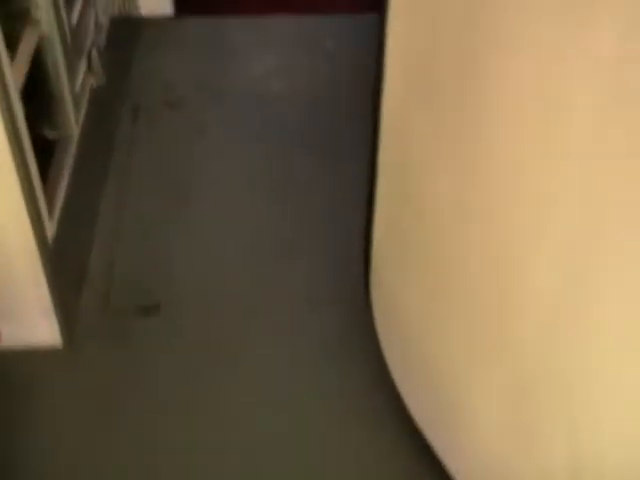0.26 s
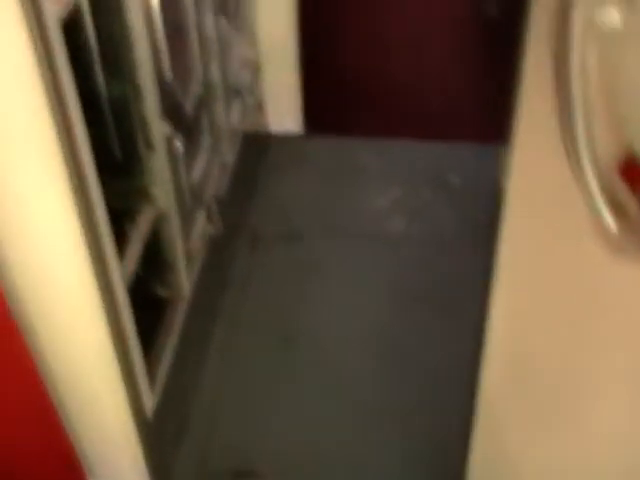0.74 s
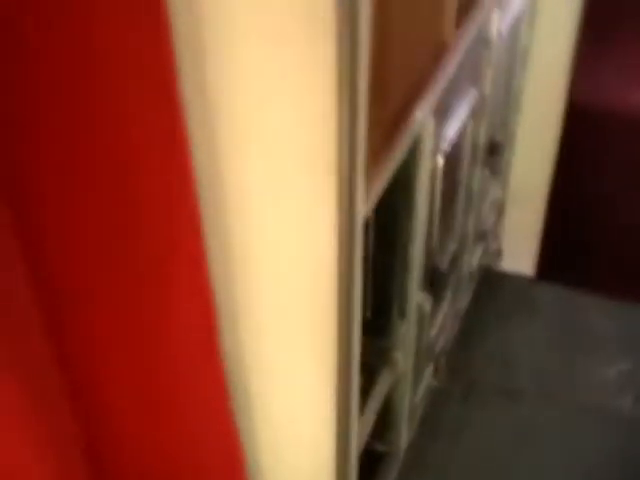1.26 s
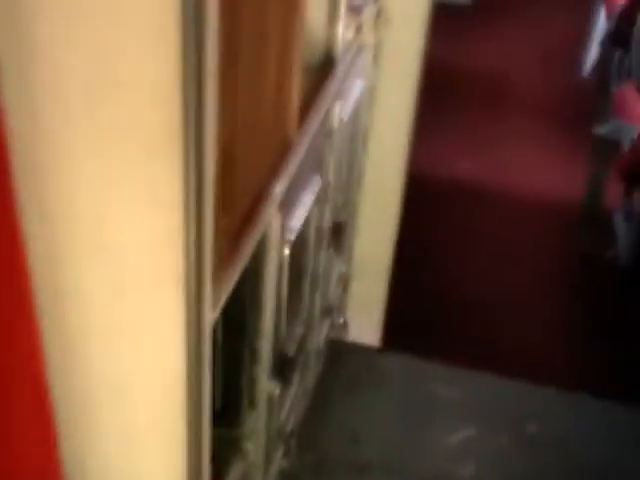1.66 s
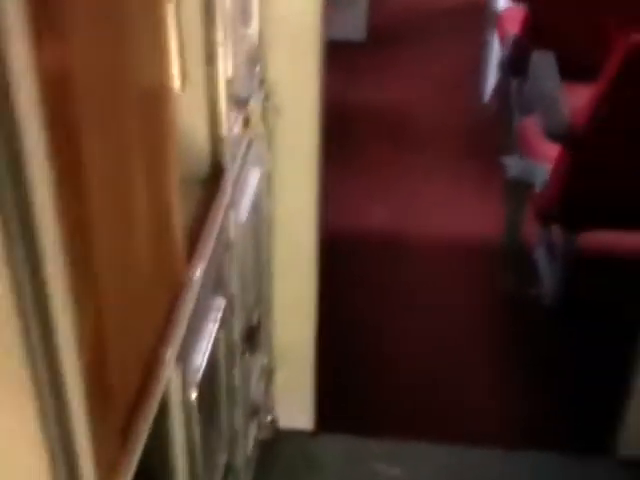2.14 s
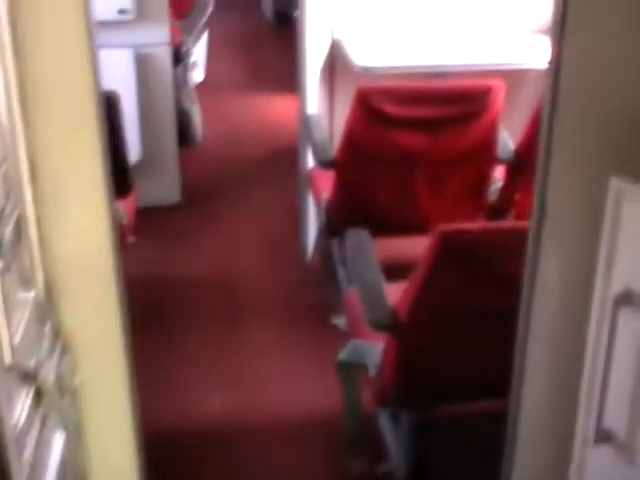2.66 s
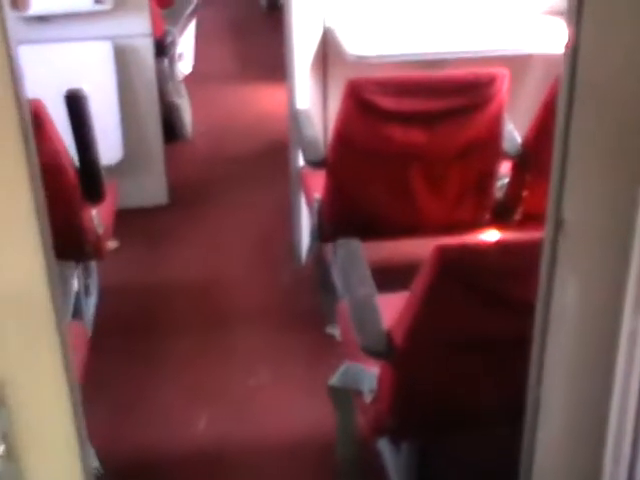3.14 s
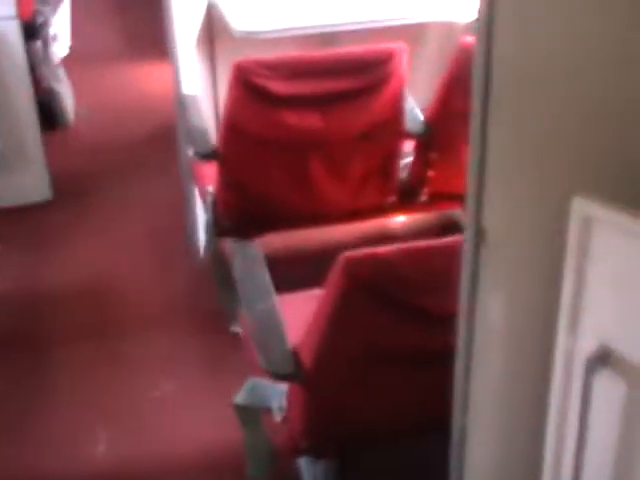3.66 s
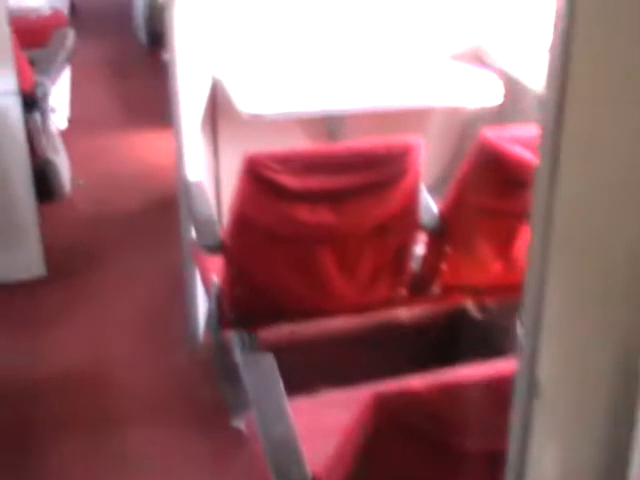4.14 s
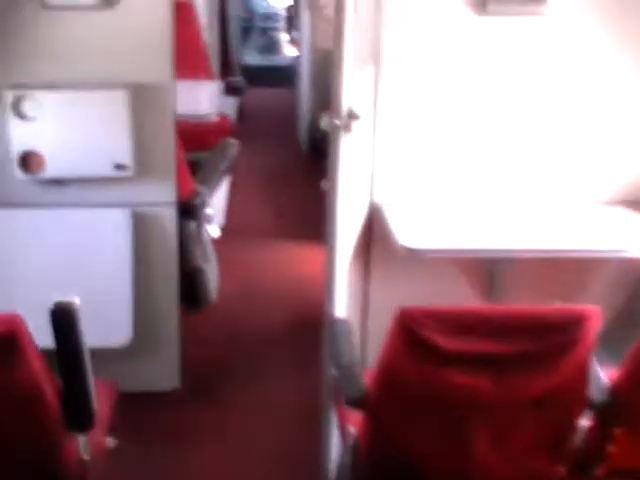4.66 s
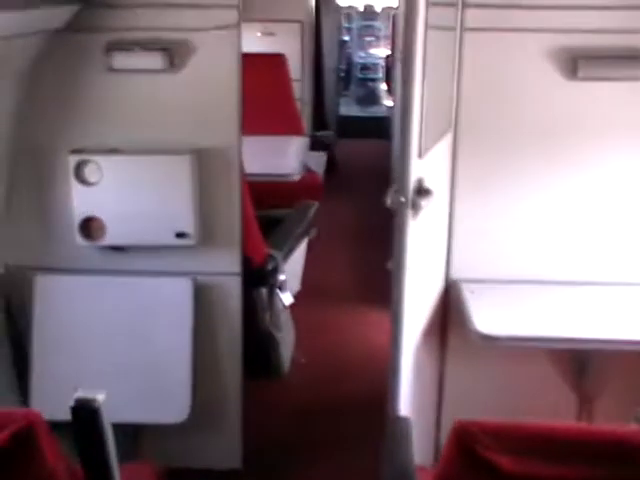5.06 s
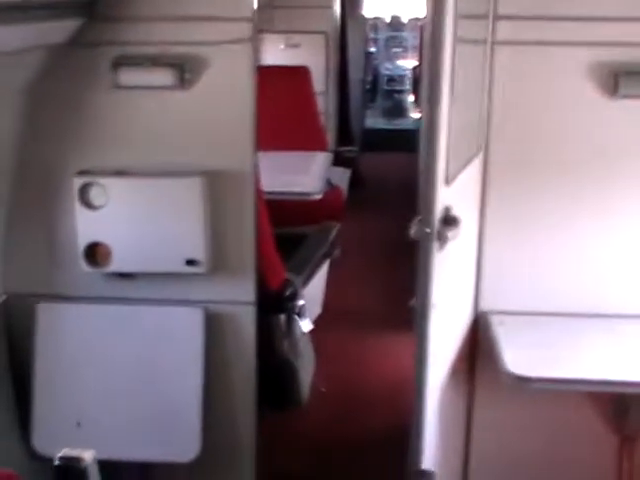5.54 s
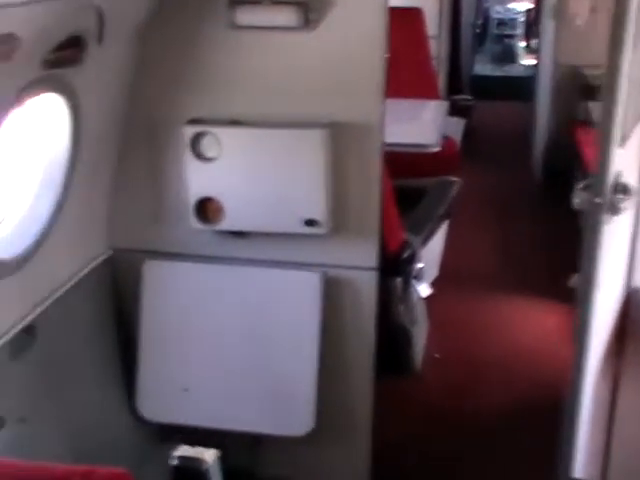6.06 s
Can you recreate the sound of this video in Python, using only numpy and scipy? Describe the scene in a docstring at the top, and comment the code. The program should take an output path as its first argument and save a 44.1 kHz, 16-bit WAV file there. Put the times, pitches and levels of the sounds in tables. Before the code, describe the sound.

A walker shifts about on hollow floor panels inside a small, padded aircraft cabin. One muted step, one hard cracking bang with a short woody rattle, then a flurry of gritty scuffs. Later steps are dull heel and toe thuds with light clicks, a brief low squeaky drag and a last quick tap. Dry, close stereo sound, low room tone, thin hiss and barely audible high electronic whine.

```python
"""Footsteps lead: someone walks the galley and aisle of a parked airliner, holding a small camera.
Heels ring hollow floor panels as damped modes under a noisy slap; one blow rings a hard cabinet.
Soles scuff and crunch as swells of coloured noise; short clicks, many at the edges of footfalls and
scuffs, are sharp edges with a ring. The floor groans and clothes rustle as noise on level curves.
The padded cabin answers with short dying noise; the camera adds hiss and two thin sine whines."""
import sys
import numpy as np
from scipy import signal
from scipy.fft import rfft, irfft, next_fast_len
from scipy.io import wavfile
from scipy.ndimage import uniform_filter1d, map_coordinates

SR = 44100
rng = np.random.default_rng(int(sys.argv[2]) if len(sys.argv) > 2 else 0)


def master_out(mix):
    """Clip the mix to full scale and print it as 16-bit PCM to the path in sys.argv[1]."""
    frames = np.transpose(np.atleast_2d(mix))
    ceiling = np.clip(frames, -1, 1)
    pcm = np.round(ceiling * 32767).astype(np.int16)
    wavfile.write(sys.argv[1], SR, pcm)


def ratio(d):
    """dB to gain"""
    e = np.asarray(d, float) / 20
    return 10 ** e


N = 278271  # length in samples

# Levels of events are peaks of the dry sound, before cabin and microphones.
# Heel and toe contacts: start_s, level_db, pitch_hz (favoured panel), t60_s (ring), rise_ms
FOOTFALLS = [(0.318, -13.5, 226, 0.23, 27), (0.55, -32.5, 226, 0.97, 37), (1.455, -16.5, 268.4, 0.098, 31),
             (2.045, -40, 156, 0.061, 1.7), (2.112, -39, 248.4, 0.19, 4.5), (2.184, -34.5, 565, 0.2, 0.53),
             (2.839, -12, 156, 0.09, 0.4), (2.924, -15.5, 156, 0.063, 0.59), (3.115, -35, 156, 0.12, 3),
             (3.6244, -19.5, 322, 0.054, 0.59), (3.696, -33, 260, .084, 1.2),
             (3.714, -34, 82.2, 0.068, 5.2), (3.878, -38, 198.8, 0.18, 4.6), (4.638, -35, 88, 0.36, 3.3),
             (4.676, -19, 164.3, 0.23, 0.94), (4.873, -37, 112, 0.061, 5), (5.118, -40.5, 88.8, 0.1, 5.1),
             (5.632, -21.5, 485, 0.041, 1.1), (5.694, -32, 565, 0.1, 0.84), (5.727, -21, 755, 0.11, 0.19),
             (5.94, -43.5, 156, 0.19, 2.3)]
# Modes of the floor panels: pitch_hz, level_db, share (of the contact's ring time)
FLOOR_PANELS = [(79.8, 3, 0.64), (112, 2, 0.68), (156, 1, 0.98), (226, 3.5, 0.38), (260, -6.5, 1),
                (296.7, -0.5, 0.92), (365.6, 9, 0.32), (435.6, 2.5, 0.59), (485, -1.5, 0.55),
                (565, 3.5, 0.7), (750, -13, 0.96), (757, 8.5, 0.15)]
# Colour of the sole's slap: pitch_hz, level_db
SLAP_COLOUR = [(150, -8.5), (500, 2), (1500, -0.5), (2500, -12.5), (5000, -31.5), (12000, -46)]
# Dying away of the slap: pitch_hz, t60_s
SLAP_DECAY = [(200, 0.22), (1000, 0.077), (3000, 0.025)]
# Slap over thud at 250 Hz; more on high spots, less as the sole rolls slowly
SLAP_DB, SLAP_DB_PER_OCTAVE, SLAP_DB_PER_MS = -5.5, 1.5, -0.28

# Blow on the cabinet: start_s, level_db (peak of its crack)
BLOWS = [(1.0943, 4)]
# Modes of the cabinet: pitch_hz, level_db, t60_s
CABINET_MODES = [(110, -12, 0.12), (157, -17.5, 0.13), (236, -23, 0.021), (357, -2, 0.051),
                 (563, -10.5, 0.2), (629, -4, 0.099), (759, -10.5, 0.12), (991, -7.5, 0.08),
                 (1168, -17.5, 0.09), (1476, -11.5, .06), (1545, -8.5, 0.13), (1726, -7.5, 0.12)]
# Dying away of the blow's crack: pitch_hz, t60_s
CRACK_DECAY = [(50, 0.3), (100, 0.92), (200, 0.096), (600, 0.11), (1500, 0.16), (3000, 0.049),
               (6000, 0.042), (12000, 0.059)]
# Colour of the crack: pitch_hz, level_db
CRACK_COLOUR = [(24, -40.5), (40, -2.5), (676, -4), (1820, -8), (2010, -9), (3140, -10), (7870, -21),
                (15000, -41)]
JOLT_DB = -32.5  # first rattle of the doors against the blow, per sample of noise

# Soles and cloth dragged briefly: start_s, level_db, pitch_hz (resonance), rise_s, t60_s
DRAGS = [(0.321, -22, 6100, 0.0013, 0.13), (.440, -32, 2690, 0.021, 0.25),
         (0.591, -37.5, 2200, 0.014, 0.16), (1.156, -24.5, 5070, 0.0067, 0.059),
         (1.194, -28, 3070, 0.016, 0.21), (1.249, -24.5, 2740, .011, 0.19), (1.328, -25.5, 4450, 0.025, 1),
         (1.467, -23.5, 1740, 0.0033, 0.053), (1.594, -32.5, 1720, 0.0084, 0.065),
         (1.64, -31.5, 4730, 0.0016, 0.83), (2.163, -31.5, 1140, 0.0056, 0.043),
         (2.295, -41.5, 2480, 0.0053, 0.83), (2.669, -39.5, 5580, 0.0025, 0.027),
         (2.777, -35.5, 1500, 0.023, 0.94), (2.86, -31.5, 2420, 0.027, 0.12),
         (3.044, -36, 4760, 0.0055, 0.14), (3.127, -36.5, 1840, 0.024, 0.07),
         (3.221, -41, 1760, 0.0088, 0.8), (3.340, -34, 2780, 0.012, 0.53),
         (3.588, -38.5, 5700, .0034, 0.14), (3.766, -34, 1920, 0.024, 0.27),
         (3.832, -34, 1420, 0.0045, 0.34), (3.865, -31, 6340, 0.012, 0.096),
         (4.738, -30.5, 2650, 0.017, 0.34), (4.823, -33.5, 1800, 0.012, 0.051),
         (4.923, -19.5, 1100, 0.022, 0.17), (5.019, -35.5, 2750, 0.0011, 0.21),
         (5.071, -39, 4550, 0.0051, 0.31), (5.196, -34, 5500, 0.011, 0.23), (5.705, -33, 2640, 0.023, 0.18)]
SCUFF_TILT_DB, DULL_DB_PER_OCTAVE = 0.02, 0.5  # treble tilt per octave; low squeaks have duller noise
OVERTONE_LOSS = 0.88  # squeak overtones weaken as this power of their number
STREAK_HZ, STREAK_DB = 110, 3  # each rub's own uneven colour: spacing and depth
FADE_POWER = 0.99  # a drag's fade in dB grows as this power of time

# Soles grinding grit: start_s, level_db, pitch_hz (band centre), rise_s, t60_s
GRINDS = [(1.115, -22.5, 2315, 0.024, 0.13), (2.856, -30, 2320, 0.012, 0.19),
          (2.961, -38.5, 5500, 0.023, 0.058), (3.334, -33.5, 8300, 0.0028, 0.058),
          (3.63, -34, 500, .006, 0.18), (5.19, -34, 1240, 0.011, 0.18), (5.7, -31.5, 1676, .006, 0.11),
          (5.724, -26.5, 1140, 0.0085, .12)]
CRUNCH_OCTAVES, CRUNCH_GRIT_DB = 0.78, 1  # half-width of the band; unevenness of the grains

# Short clicks, many at the edges of footfalls and scuffs: start_s, level_db, pitch_hz, t60_s
SHORT_CLICKS = [(0.326, -28.5, 684, 0.23), (1.329, -28.5, 1010, 0.019), (2.396, -34.5, 743, 0.064),
                (2.603, -44, 1690, 0.055), (2.671, -42, 654, 0.035), (2.673, -43, 2290, 0.027),
                (2.843, -31, 2260, 0.063), (3.3339, -21, 6550, 0.0018), (3.399, -30.5, 2160, 0.013),
                (3.6252, -23, 1330, 0.037), (3.6429, -20.5, 3950, 0.0028)]

# The floor working under the walker's weight: start_s, level_db
FLOOR_LOAD = [(0, -47.5), (.3, -73), (.44, -42), (.62, -41.5), (.85, -60), (1.08, -49.5), (1.35, -39),
              (1.55, -40.5), (1.8, -64), (2.02, -67), (2.2, -49), (2.32, -74), (2.74, -69.5), (3, -56),
              (3.52, -60.5), (3.75, -80), (4, -52), (4.15, -71.5), (4.8, -59), (4.9, -46.5), (5.5, -88),
              (5.8, -79), (5.95, -50), (6.05, -80), (6.31, -61)]
# Colour of the floor's rumble: pitch_hz, level_db
FLOOR_COLOUR = [(25, -11.5), (60, -6.5), (150, -12), (250, -5), (500, -8), (900, -27), (1500, -49)]
GROAN_TOP_HZ = 271.2  # only contacts on panels pitched below this steer the groan

# Clothes moving: start_s, level_db, treble_db (over the body of the cloth)
CLOTH_MOVES = [(0, -49.5, 2), (.3, -66, 15.5), (.44, -56, 3), (.62, -50.5, -8), (.8, -62, 11.5),
               (.92, -53.5, 8), (1.08, -59, 11), (1.2, -34.5, -11), (1.31, -54, 4), (1.44, -42, 6),
               (1.55, -59, -32), (1.75, -48.5, -11), (1.85, -61.5, -5.5), (2.2, -48.5, 0), (2.32, -60, -25),
               (2.74, -54, -2.5), (3.2, -48, -10.5), (3.52, -57.5, -13), (4, -48, -5), (4.2, -55, -2.5),
               (4.6, -48, 1), (5.15, -52, -14), (5.3, -59, -22.5), (5.5, -56, -3), (5.95, -58, -1),
               (6.05, -63.5, -12.5), (6.31, -62, -10)]
# Colour of rubbed cloth and soles: pitch_hz, level_db
CLOTH_COLOUR = [(250, -21.5), (500, 1), (1400, 1), (2600, -2), (4500, -5), (9500, -12.5), (14000, -32.5)]

# Colour of room tone and camera hiss: pitch_hz, level_db
HISS_COLOUR = [(25, -8), (100, 6), (300, 1.5), (600, -3), (1500, -14.5), (6000, -15), (12500, -22.5),
               (14000, -37)]
HISS_DB = -58  # rms, before the cabin's colour and the microphones
# Sines of the camera's electronics: pitch_hz, level_db (rms, before left-right placing)
WHINE_TONES = [(12000, -80.5), (10500, -90)]

# Stereo likeness of scattered sound: pitch_hz, likeness (0 to 1)
SCATTERED_LIKENESS = [(60, 0.96), (500, 0.19), (2000, 0.48), (8000, 0.92), (13000, 0.11)]
# Stereo likeness of blows close by: pitch_hz, likeness (0 to 1)
NEARBY_LIKENESS = [(60, 0.97), (250, 0.98), (1000, .8), (4000, 0.83), (12000, 0.53)]
# Dying away of the cabin's answer: pitch_hz, t60_s
CABIN_DECAY = [(100, 0.63), (500, 0.2), (2000, 0.27), (10000, 0.19)]
# Pitches the cabin tube favours in scattered sound: pitch_hz, width_hz, level_db
TUBE_RESONANCES = [(532, 30, 1.5), (860, 43, 2), (1267, 89, 1.5), (1720, 21, 2)]
# Lean of the microphone pair: pitch_hz, level_db (left over right)
MICROPHONE_LEAN = [(60, -2), (240, -0.5), (950, 2), (3770, 0.5), (15000, 0.5)]


def steps():
    """Each contact rings panels near its spot under the sole's slap; a rolling sole builds up slowly."""
    track = np.zeros((2, N))
    hz, level, share = np.transpose(FLOOR_PANELS)
    for s, db, spot_hz, t60, rise_ms in FOOTFALLS:
        octaves = np.log2(hz / spot_hz)
        near = np.exp(-(octaves / 0.045) ** 2)
        # panels fall off with distance in pitch, faster below the spot than above
        reach_db = -np.where(octaves > 0, 5, 12) * np.abs(octaves) + 5 * near
        detune = 0.01 * rng.standard_normal(len(hz))
        chance_db = 2 * rng.standard_normal(len(hz))
        rise = np.clip(rise_ms, 0.2, 30) / 1000
        ring_s = share * t60 * (1 + 0.4 * near)
        thud = ring(hz * (1 + detune), level + reach_db + chance_db, ring_s, rise)

        slap_db = SLAP_DB + SLAP_DB_PER_OCTAVE * np.log2(spot_hz / 250) + SLAP_DB_PER_MS * rise_ms
        slap = filtered(dying(SLAP_DECAY)[0], lambda f: ratio(along(SLAP_COLOUR, f)))
        slap = slap * (1 - np.exp(-np.arange(len(thud)) / SR / rise))
        contact = peak1(thud + ratio(slap_db) * peak1(slap))
        add(track, s, ratio(db) * in_cabin(contact, wet_db=-10))
    return track


def knock():
    """A hard blow: loose doors keep jolting the cabinet's modes, under a crack of dying noise."""
    track, t = np.zeros((2, N)), np.arange(SR // 2) / SR
    hz, level, t60 = np.transpose(CABINET_MODES)
    for s, db in BLOWS:
        rattle = rng.standard_normal(len(t)) * ratio(JOLT_DB - 60 * t / 0.08)
        jolts = (t == 0) + rattle  # the first blow is a single sample
        body = signal.fftconvolve(ring(hz, level, t60, rise=0.00021), jolts)[:len(t)]
        crack = filtered(dying(CRACK_DECAY), lambda f: ratio(along(CRACK_COLOUR, f)))
        crack = crack * (1 - np.exp(-t / 0.00053))
        answered = in_cabin(peak1(body), wet_db=-8.5)[:, :len(t)]
        add(track, s, ratio(db) * (peak1(crack) + 0.67 * answered))
    return track


def scuffs():
    """Friction noise swells and fades; slow slipping squeaks as resonances with overtones."""
    track, t = np.zeros((2, N)), np.arange(SR // 2) / SR
    for s, db, hz, rise, t60 in DRAGS:
        noise = rush(CLOTH_COLOUR, len(t), patchy_db=0, apart=0.35)
        tilt_db = SCUFF_TILT_DB + DULL_DB_PER_OCTAVE * np.log2(hz / 2500)
        knots = rng.standard_normal(round(SR / 2 / STREAK_HZ) + 4)

        def squeak(f):
            """Resonant peaks at the first three harmonics, over a flat floor."""
            gain = 1
            for k in range(1, 4):
                peak = 4500 / hz / k ** OVERTONE_LOSS
                gain = gain + peak / (1 + ((f - k * hz) / (0.041 * hz)) ** 2)
            return gain

        def colour(f):
            """Uneven streaks and a treble tilt on top of the squeak."""
            streak_db = STREAK_DB * map_coordinates(knots, [f / STREAK_HZ])
            return ratio(streak_db + tilt_db * np.log2((f + 200) / 3000)) * squeak(f)

        add(track, s, ratio(db) * peak1(swell(t, rise, t60) * filtered(noise, colour)))
    return track


def crunches():
    """Soles grind grit: grainy noise in one wide band, swelling and fading like a scuff."""
    track, t = np.zeros((2, N)), np.arange(SR // 4) / SR
    for s, db, hz, rise, t60 in GRINDS:
        noise = paired(rng.standard_normal((2, len(t))), apart=1.2, alike=NEARBY_LIKENESS)
        grains = noise * grit(len(t), depth_db=CRUNCH_GRIT_DB)
        band = filtered(grains, lambda f: 1 / (1 + (np.log2((f + 1) / hz) / CRUNCH_OCTAVES) ** 4))
        add(track, s, ratio(db) * peak1(swell(t, rise, t60) * band))
    return track


def clicks():
    """One sharp edge, wide in pitch, and a short ring of narrow noise."""
    track, t = np.zeros((2, N)), np.arange(SR // 10) / SR
    for s, db, hz, t60 in SHORT_CLICKS:
        edge = np.sin(2 * np.pi * hz * t) * np.exp(-0.8 * hz * t)
        # the shorter the ring, the wider its band
        buzz = filtered(rng.standard_normal(len(t)), lambda f: 1 / (1 + ((f - hz) / (6 / t60)) ** 2))
        sound = peak1(peak1(edge) + unit(buzz) * ratio(-60 * t / t60))
        add(track, s, ratio(db) * in_cabin(sound, wet_db=-10))
    return track


def groan():
    """The floor groans under shifting weight, rumble boosted near the big panel last trodden."""
    level_db, = curves(FLOOR_LOAD)
    big = [(row[0], row[2]) for row in FOOTFALLS if row[2] < GROAN_TOP_HZ]
    trodden_s, trodden_hz = np.transpose(big)
    rumble = rush(FLOOR_COLOUR, N, patchy_db=2.54, apart=0.7)
    hz, t, z = signal.stft(rumble, SR, nperseg=2048)
    # ahead of the first contact, its panel already sets the pitch
    loaded = trodden_hz[np.clip(np.searchsorted(trodden_s, t) - 1, 0, None)]
    boost = 1 + 3 / (1 + ((hz[:, None] - loaded) / (0.026 * loaded)) ** 2)
    sound = signal.istft(z * boost, SR, nperseg=2048)[1][:, :N]
    return ratio(level_db) * unit(sound)


def rustle():
    """Cloth rubs in fine grains of noise, its level and treble following the moves."""
    cloth_db, treble_db = curves(CLOTH_MOVES)
    flutter = map_coordinates(rng.standard_normal(N // 1000 + 4), [np.arange(N) / 1000])
    cloth = rush(CLOTH_COLOUR, N, patchy_db=1.5, apart=0.6)
    cloth = cloth * ratio(0.17 * flutter) * grit(N, depth_db=1.0)
    low = filtered(cloth, lambda f: 1 / (1 + (f / 3000) ** 2))
    return ratio(cloth_db) * (low + ratio(treble_db) * (cloth - low))


def camera():
    """Faint room tone and camera hiss as steady noise, and the electronics' whines as sines."""
    t = np.arange(N) / SR
    whine = sum(ratio(db) * np.sqrt(2) * np.sin(2 * np.pi * hz * t) for hz, db in WHINE_TONES)
    hiss = hollow(rush(HISS_COLOUR, N, patchy_db=2.0, apart=4))
    return ratio(HISS_DB) * hiss + whine * ratio([[2], [-2]])  # whines lean left


def in_cabin(sound, wet_db):
    """The sound and the cabin's short answer 4 ms later, drawn anew for every event."""
    tail = np.pad(dying(CABIN_DECAY, apart=1.9), ((0, 0), (round(0.004 * SR), 0)))
    wet = signal.fftconvolve(sound[None], tail, axes=1)
    return np.pad(sound, (0, wet.shape[1] - len(sound))) + ratio(wet_db) * wet


def hollow(x):
    """Scattered sound coloured by the cabin's resonances."""
    def gain(f):
        return ratio(sum(db / (1 + ((f - hz) / width) ** 2) for hz, width, db in TUBE_RESONANCES))
    return filtered(x, gain)


def ring(hz, db, t60, rise):
    """Damped modes struck together, neighbours roughly in opposite senses; peak 1."""
    t = np.arange(SR // 2) / SR
    phase = np.pi * np.arange(len(hz))[:, None] + rng.normal(0, 0.89, (len(hz), 1))
    decay = ratio(db[:, None] - 60 * t / t60[:, None])
    modes = decay * np.sin(2 * np.pi * hz[:, None] * t + phase)
    return peak1(modes.sum(0) * (1 - np.exp(-t / rise)))


def dying(t60s, apart=1):
    """Half a second of stereo noise in which each octave dies at its own speed."""
    t = np.arange(SR // 2) / SR
    centres = 40 * 2. ** np.arange(9)[:, None, None]
    noise = paired(rng.standard_normal((2, len(t))), apart, NEARBY_LIKENESS)
    bands = filtered(noise, lambda hz: np.clip(1 - np.abs(np.log2((hz + 1) / centres)), 0, 1))
    tail = (bands * ratio(-60 * t / along(t60s, centres))).sum(0)
    return tail / np.linalg.norm(tail[0])  # left channel has energy 1


def rush(spectrum, size, patchy_db, apart):
    """Coloured stereo noise of rms 1 with patches of random gain in time and pitch."""
    z = signal.stft(rng.standard_normal((2, size)), nperseg=256)[2]
    field = uniform_filter1d(rng.standard_normal(z.shape[1:]), 4, 0)
    field = uniform_filter1d(field, 8, 1)
    pair = signal.istft(z * ratio(patchy_db * unit(field)), nperseg=256)[1][:, :size]
    return unit(filtered(paired(pair, apart), lambda hz: ratio(along(spectrum, hz))))


def paired(pair, apart=1, alike=SCATTERED_LIKENESS):
    """Mixes two unrelated noises to a left-right likeness per pitch, raised to the power apart."""
    def turn(hz):
        return np.arccos(np.clip(along(alike, hz), 0, 1) ** apart) / 2
    mid, side = filtered(pair, lambda hz: np.array([np.cos(turn(hz)), np.sin(turn(hz))]))
    return np.array([mid + side, mid - side])


def grit(size, depth_db):
    """Gain that wanders smoothly from grain to grain, about 300 grains a second."""
    knots = rng.standard_normal(size // 150 + 4)
    return ratio(depth_db * map_coordinates(knots, [np.arange(size) / 150]))


def swell(t, rise, t60):
    """A straight rise, then a fade almost straight in dB."""
    fade = ratio(-60 * (np.abs(t - rise) / t60) ** FADE_POWER)
    return np.where(t < rise, t / rise, fade)


def filtered(x, response):
    """x shaped by a response given as a function of frequency."""
    m = next_fast_len(x.shape[-1] + 8192)
    return irfft(rfft(x, m) * response(np.fft.rfftfreq(m, 1 / SR)), m)[..., :x.shape[-1]]


def along(points, hz):
    """Reads a (pitch_hz, value) curve on a log pitch axis."""
    f, v = np.transpose(points)
    return np.interp(np.log(hz + 1), np.log(f + 1), v)


def curves(rows):
    """One value per sample for each column after the time."""
    s, *cols = np.transpose(rows)
    return [np.interp(np.arange(N) / SR, s, c) for c in cols]


def unit(x):
    """Scaled to rms 1."""
    return x / np.sqrt(np.mean(x ** 2) + 1e-20)


def peak1(x):
    """Scaled to peak 1."""
    return x / np.abs(x).max()


def add(track, s, sound):
    """Mixes a sound into the track at s seconds, cut at the end."""
    part = track[..., round(s * SR):][..., :sound.shape[-1]]
    part += sound[..., :part.shape[-1]]


def scene():
    """Everything at the microphones."""
    scattered = hollow(scuffs() + crunches() + groan() + rustle())
    return steps() + knock() + clicks() + scattered + camera()


def roll_off(x):
    """The treble ends steeply here."""
    return signal.sosfilt(signal.butter(12, 16010, fs=SR, output="sos"), x)


def record(dry):
    """The microphones shed deep bass and top treble and lean a little; peaks round off near full scale."""
    def lean(hz):
        return ratio(along(MICROPHONE_LEAN, hz) * [[0.5], [-0.5]])

    def band(hz):
        bass_cut = (1j * hz / (1j * hz + 35)) ** 3
        return bass_cut / (1 + (hz / 14500) ** 20)

    heard = filtered(dry, lambda hz: lean(hz) * band(hz))
    top = 0.95  # ceiling, 1 = full scale
    mix = heard / (1 + np.abs(heard / top) ** 6) ** (1 / 6)
    return roll_off(mix)


dry = scene()
out = record(dry)
master_out(out)
```